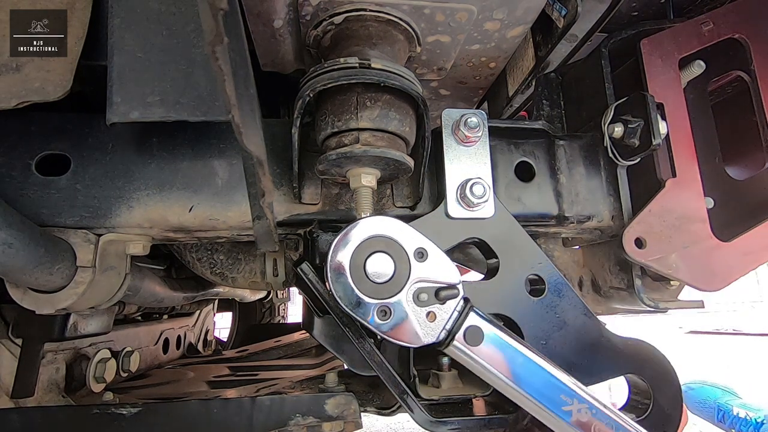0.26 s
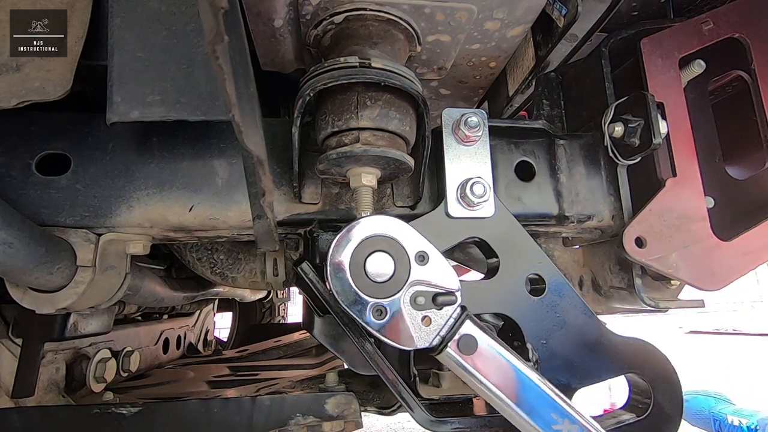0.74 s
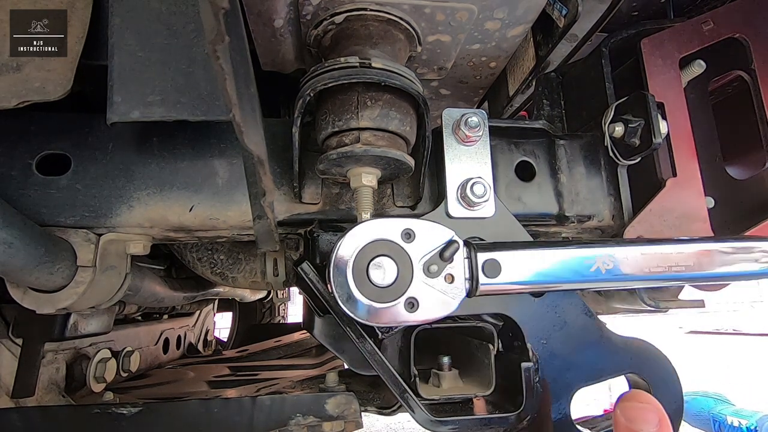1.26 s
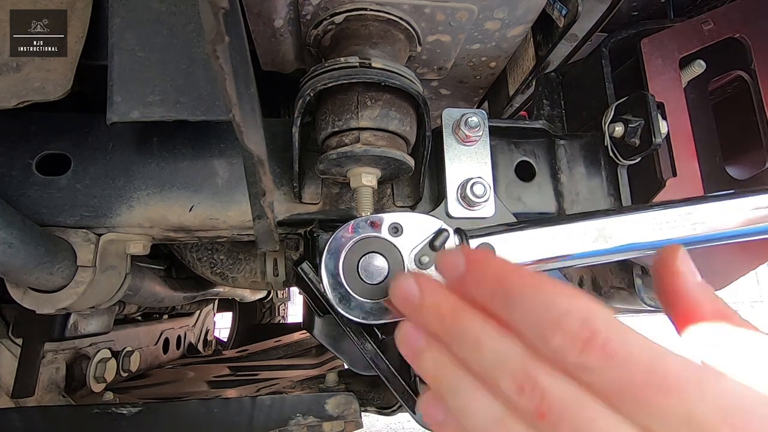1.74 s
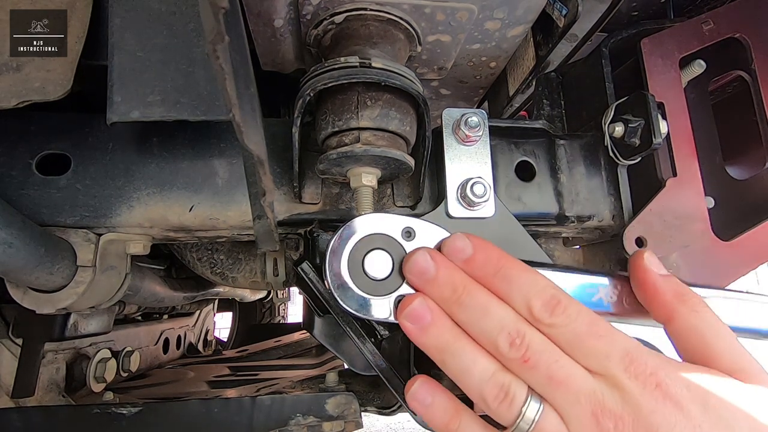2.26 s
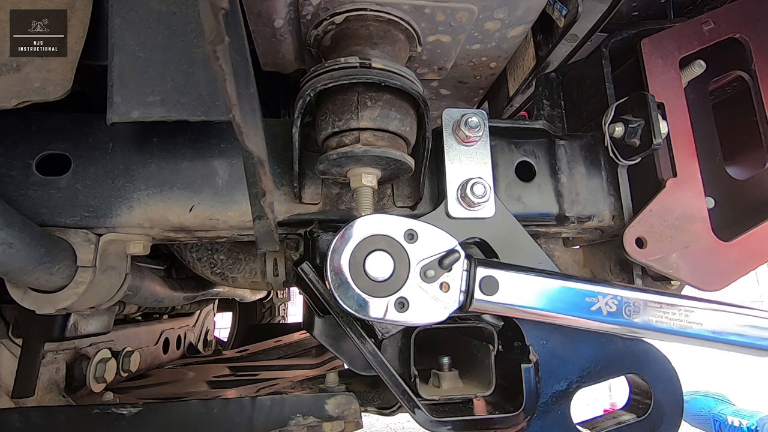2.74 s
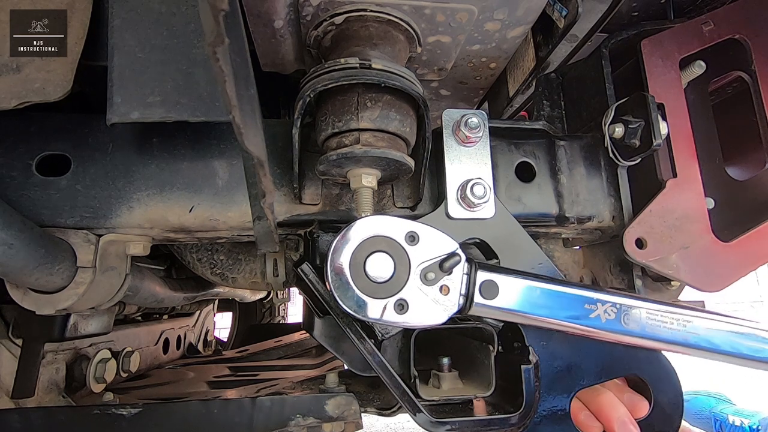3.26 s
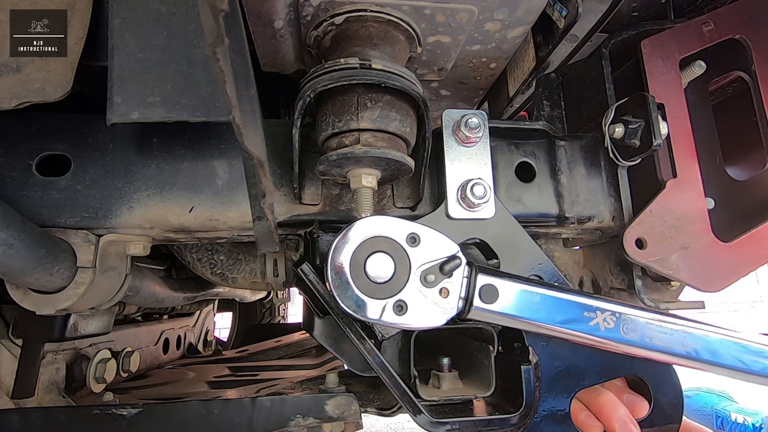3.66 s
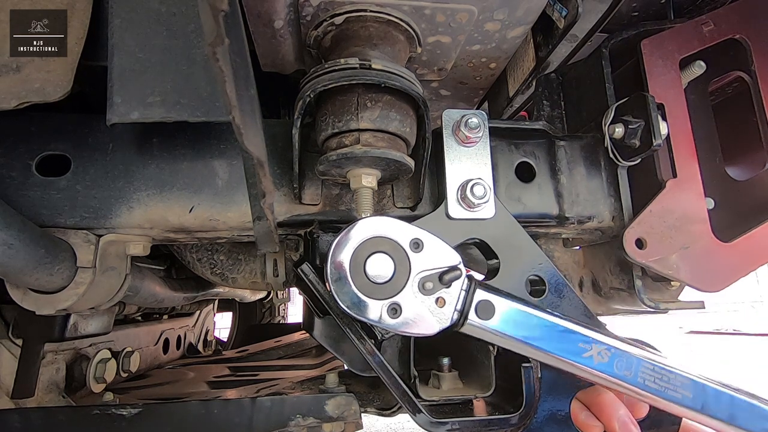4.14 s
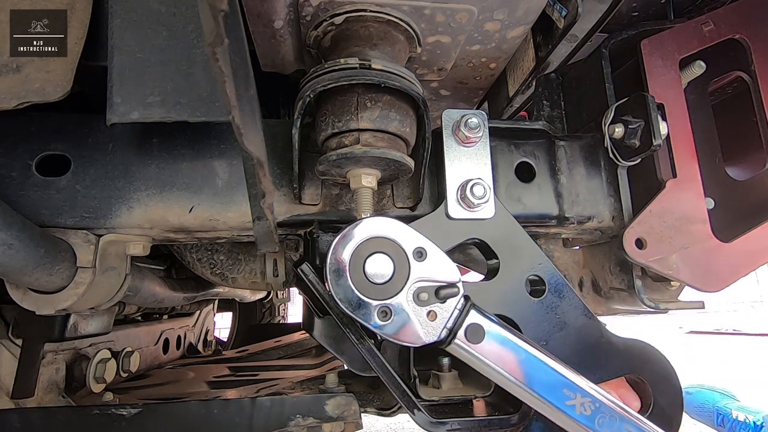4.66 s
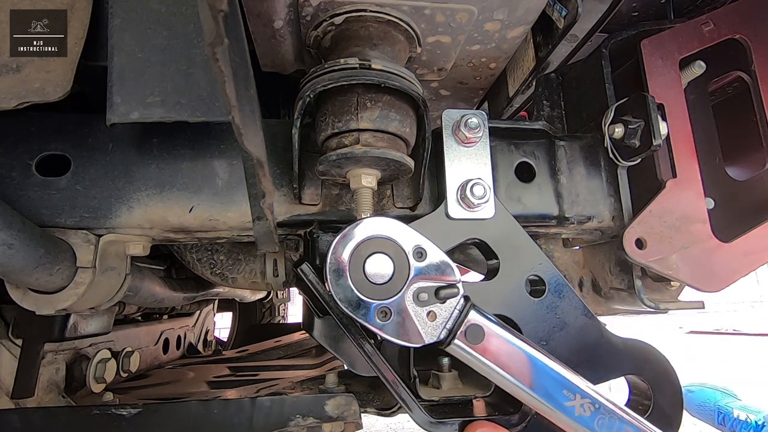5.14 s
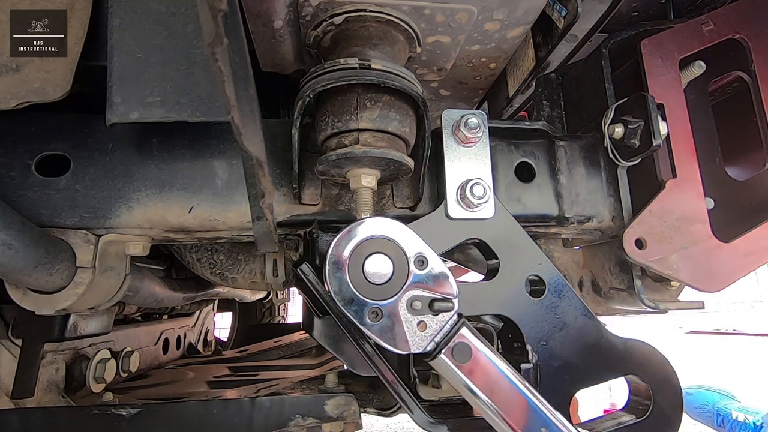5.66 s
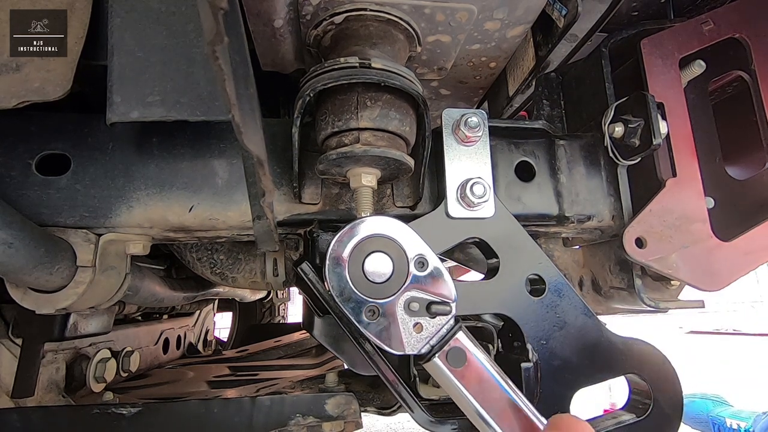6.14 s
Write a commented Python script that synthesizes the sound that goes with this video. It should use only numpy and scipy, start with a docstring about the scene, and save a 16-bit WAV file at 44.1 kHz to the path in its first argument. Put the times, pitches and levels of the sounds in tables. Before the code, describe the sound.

Metal rubs softly, then a ratchet head clicks twice, crisp and near. A low knock of the socket follows among faint ticks, over hushed air and deep rumble. A distant dove-like cooing barely shows, echoing. Tiny squeaks of strained steel lead to two explosive steel cracks about a third of a second apart, ringing briefly under the vehicle. Close, dry, almost centred microphone.

```python
"""Torque wrench under a truck

Close microphone under the vehicle: a click-type wrench tightens a bolt on the frame amid quiet garage air and rumble.
Filtered noise scrapes as the handle swings back; two loud pawl clicks and fainter ticks are decaying noise bursts.
A dull double knock follows, and thin squeaks glide. Something coos faintly far away: trembling tones with echoes.
At the end the wrench breaks over twice: noise bursts for the snap, decaying sines for the ringing steel.
"""
import sys
import numpy as np
from scipy import signal
from scipy.fft import rfft, irfft
from scipy.io import wavfile
from scipy.ndimage import uniform_filter1d

SR = 44100
rng = np.random.default_rng(int(sys.argv[2]) if len(sys.argv) > 2 else 0)


def waveform_to_disk(signal):
    """Save audio, clipped to [-1, 1], as 16-bit WAV at the path in sys.argv[1]."""
    frames = np.transpose(np.atleast_2d(signal))
    scaled = np.clip(frames, -1, 1) * 32767
    samples = np.round(scaled).astype(np.int16)
    wavfile.write(sys.argv[1], SR, samples)


N = 282681
TIME = np.arange(N) / SR  # seconds into the scene
AGE = np.arange(SR) / SR  # seconds since a sound began, up to one second


def undb(db):
    """Decibels to gain."""
    return 10 ** (np.asarray(db) / 20)


def unit(x):
    """Scale to rms 1."""
    return x / np.sqrt(np.mean(x ** 2))


def across(rows, hz):
    """The columns of a frequency table, read at hz on a logarithmic frequency scale."""
    table_hz, *columns = np.transpose(rows)
    log_hz = np.log(np.maximum(hz, 1))
    return [np.interp(log_hz, np.log(table_hz), column) for column in columns]


def noise(colour, size, tilt_db=0):
    """Noise of rms 1 with a given spectrum, tilted above 1 kHz by tilt_db per octave."""
    hz = np.maximum(np.fft.rfftfreq(size, 1 / SR), 1)
    db = across(colour, hz)[0] + tilt_db * np.log2(np.maximum(hz / 1000, 1))
    random_phases = np.exp(2j * np.pi * rng.random(len(hz)))
    return unit(irfft(undb(db) * random_phases, size))


def resonance(hz, width_hz, size):
    """Noise of rms 1 in one steep resonance."""
    f = np.fft.rfftfreq(size, 1 / SR)
    peak = 1 / (1 + (2 * (f - hz) / width_hz) ** 2)
    return unit(irfft(rfft(rng.standard_normal(size)) * peak, size))


def fade(t60):
    """Exponential decay, 60 dB down after t60 seconds."""
    return np.exp(-np.log(1000) * AGE / t60)


def arch(length):
    """A swell that comes and goes within length seconds."""
    return np.sin(np.pi * np.minimum(AGE / length, 1))


def gesture(start, rise_s, hold_s, fall_s):
    """Effort from 0 to 1 and back: it eases up from start, holds, then lets go."""
    up = (TIME - start) / rise_s
    down = (start + rise_s + hold_s + fall_s - TIME) / fall_s
    return np.sin(np.pi / 2 * np.clip(np.minimum(up, down), 0, 1))


def waver(rate_hz):
    """A random wander of rms 1, mostly slower than a few times rate_hz."""
    return noise([(rate_hz, 0), (4 * rate_hz, -40), (8 * rate_hz, -120)], N)


def tone(hz, wobble):
    """A single line of rms 1 whose pitch trembles by the rms share wobble."""
    trembling_hz = hz * (1 + wobble * waver(74)[:len(hz)])
    return np.sqrt(2) * np.sin(2 * np.pi * np.cumsum(trembling_hz) / SR)


def add(out, start, x):
    """Mix x into out from start seconds."""
    i = int(start * SR)
    out[i:i + len(x)] += x[:max(N - i, 0)]


# Resonances of the ratchet head. Each row: centre in Hz, width in Hz, lift in dB.
HEAD_RESONANCES = [(1181, 73, 5.5), (1540, 40, -0.5), (1890, 30, 5.5), (2615, 220, 6.5), (3340, 150, 2.5),
                   (4340, 100, 3), (5200, 100, 4), (6000, 120, -3), (6750, 200, 0.5), (7700, 150, -2),
                   (10300, 230, 5.5), (12000, 200, 1.5)]


def head(x):
    """Lift the narrow resonances of the ratchet head, then scale to rms 1."""
    hz = np.fft.rfftfreq(len(x), 1 / SR)
    gain = 1
    for centre_hz, width_hz, db in HEAD_RESONANCES:
        gain = gain + (undb(db) - 1) / (1 + (2 * (hz - centre_hz) / width_hz) ** 2)
    return unit(irfft(rfft(x) * gain, len(x)))


# How fast a blow dies under the vehicle, before each blow's own length factor.
# Each row: frequency in Hz, early t60 in seconds, late t60 in seconds.
BLOW_DECAY = [(100, 0.81, .9), (400, 0.5, 0.63), (1000, 0.4, 0.45), (2500, 0.21, 0.52), (6000, 0.12, 0.3),
              (13100, 0.051, 0.21)]
LATE_DB = -20  # level of the lingering part against the early part


def blow(wash, length, rise_s, cluster_db=2.5):
    """Crowded modes and close reflections of one blow: each octave dies fast at first, then lingers."""
    # modes bunch at random, so peaks and gaps a few tens of Hz wide run through the spectrum
    clusters = unit(uniform_filter1d(rng.standard_normal(len(AGE) // 2 + 1), size=36))
    spectrum = rfft(wash) * unit(undb(cluster_db * clusters))
    octave = np.log2(np.clip(np.fft.rfftfreq(len(AGE), 1 / SR), 2 ** 6, 2 ** 14))
    out = 0
    for k in range(6, 15):  # overlapping bands centred on 64 Hz to 16384 Hz
        early, late = across(BLOW_DECAY, 2 ** k)
        band = irfft(spectrum * np.maximum(1 - abs(octave - k), 0), len(AGE))
        lingering = undb(LATE_DB) * fade(late * np.sqrt(length))
        out = out + band * np.hypot(fade(early * length), lingering)
    return out * (1 - np.exp(-AGE / rise_s))


# Modes of wrench, bracket and frame, before scatter and the blow's own level.
# Each row: frequency in Hz, level in dB, t60 in seconds.
STEEL_MODES = [(75, -49, 2.2), (157.9, -45, 1), (230, -42.5, 0.72), (298.7, -34.5, 0.5), (364.4, -29, 0.73),
               (392, -35, 1.3), (455, -37, 0.47), (584, -29, 0.43), (719, -31.5, 0.87), (762, -30.5, 0.31),
               (832, -20, 0.14), (910, -26, 0.32), (945, -33.5, 0.19), (982, -22, 0.21), (1040, -28, 0.51),
               (1079, -16, 0.12), (1199, -23.5, 0.2), (1203, -20.5, 0.16), (1605, -32.5, 0.37),
               (1854, -32, 0.34), (2186, -46.5, 0.24), (2743, -27.5, 0.28), (2840, -32, 0.3),
               (2880, -38.5, 0.44), (3360, -26.5, 0.088), (3950, -38, 0.14), (4140, -12.5, 0.096),
               (3990, -41, 0.29), (5600, -40.5, .16), (7040, -15, 0.09)]


def ring(soft_hz, scatter_db):
    """The steel's modes as decaying sines; a soft contact weakens those above soft_hz."""
    out = 0
    scatter = rng.standard_normal((len(STEEL_MODES), 3))
    for (hz, db, t60), (size, detune, phase) in zip(STEEL_MODES, scatter):
        gain = undb(db + scatter_db * size) / (1 + (hz / soft_hz) ** 2)
        mode_hz = hz * (1 + 0.002 * detune)
        out = out + gain * fade(t60) * np.sin(2 * np.pi * (mode_hz * AGE + phase))
    return out * (1 - np.exp(-AGE / 0.003))


# Quiet garage air around the microphone. Each row: frequency in Hz, relative level in dB per Hz.
AIR_COLOUR = [(35, -33), (60, 2.5), (96, -7), (291, -9.5), (343, -12), (705, -14), (792, -18), (910, -16.5),
              (1120, -19.5), (1230, -19.5), (1910, -23.5), (15500, -32)]
AIR_DB = -63.5


def garage_air():
    """Steady noise with the colour of the garage, the same in both channels."""
    return undb(AIR_DB) * noise(AIR_COLOUR, N)


# Deep rumble at the microphone. Each row: frequency in Hz, relative level in dB per Hz.
RUMBLE_SPECTRUM = [(1, -7), (3, 1.5), (6, 3), (10, -17.5), (20, -19.5), (40, -37.5), (80, -59), (300, -100),
                   (1000, -140)]
# it builds while the wrench is reset, then settles for the slow pull
RUMBLE_DB, RUMBLE_SWELL_DB = -38.5, 9
RUMBLE_BUILD_S, RUMBLE_HOLD_S, RUMBLE_SETTLE_S = 2.62, 0.11, 0.22


def rumble():
    """Deep slow stirring at the microphone, stronger while the wrench is moved about."""
    bustle = gesture(0, RUMBLE_BUILD_S, RUMBLE_HOLD_S, RUMBLE_SETTLE_S)
    return undb(RUMBLE_DB + RUMBLE_SWELL_DB * bustle) * noise(RUMBLE_SPECTRUM, N)


# Strokes close by in which head and socket rub.
# Each row: start in seconds, hold in seconds, release t60 in seconds, level in dB.
RUB_STROKES = [(0, 0.037, 1.2, -73.5), (0.79, .07, 0.71, -63), (0.889, 0.22, 0.92, -50.5),
               (1.642, .6, 2, -64), (2.277, 0.012, 0.24, -48.5), (2.863, .08, .8, -74),
               (5.29, .04, 1, -67.5), (5.605, 0.028, 1, -63)]
# Colour of the rubbing, before the head's resonances. Each row: frequency in Hz, relative level in dB per Hz.
RUB_SPECTRUM = [(100, -1.5), (300, -1), (480, -2.5), (750, 0.5), (1000, -7.5), (1600, -5), (2400, -13),
                (4000, -17), (7000, -22.5), (15000, -41)]
# Thin dry hiss of sliding contact, before the head's resonances and the swell.
# Each row: start in seconds, length in seconds, centre in Hz, width in Hz, level in dB.
SLIDE_HISSES = [(0.376, 0.22, 4270, 2730, -70), (0.601, 0.23, 4280, 2420, -67),
                (0.889, 0.063, 7700, 1100, -58), (0.937, 0.37, 5160, 600, -60.5),
                (0.93, 0.43, 10800, 9000, -64.5), (1.845, .5, 5400, 2400, -76),
                (2.837, 0.26, 3500, 7000, -68)]
RUB_ATTACK_S, GRIP_DB = 0.022, -78  # a stroke starts quickly; the held wrench never rests entirely


def rubbing():
    """Metal slips in uneven little steps during each stroke, with a thin hiss where surfaces slide."""
    slip_sizes = undb(2.9 * rng.exponential(size=N))
    slips = (rng.random(N) < 300 / SR) * slip_sizes  # about 300 per second
    power = signal.fftconvolve(slips, fade(0.087))[:N]
    grain = np.sqrt(np.abs(power) / np.mean(power))
    friction = undb(GRIP_DB)
    for start, hold, t60, db in RUB_STROKES:
        attack = np.clip((TIME - start) / RUB_ATTACK_S, 0, 1)
        since_hold = np.maximum(TIME - start - RUB_ATTACK_S - hold, 0)
        release = np.exp(-np.log(1000) * since_hold / t60)
        friction = np.hypot(friction, undb(db) * attack * release)
    out = friction * grain * head(noise(RUB_SPECTRUM, N))
    for start, length, hz, width_hz, db in SLIDE_HISSES:
        hiss = head(resonance(hz, width_hz, len(AGE)))
        add(out, start, undb(db) * arch(length) * hiss)
    return out


# Faint thin squeaks of strained steel, before their shared waver in level.
# Each row: start in seconds, length in seconds, starting pitch in Hz, glide in Hz per second, level in dB.
STEEL_SQUEAKS = [(0.297, .055, 2650, 6497, -72), (5.404, 0.16, 2485, -200, -76.5),
                 (5.587, 0.057, 2550, 807, -73), (5.727, .11, 2500, 698, -78)]


def squeaks():
    """Steel sticks and slips fast enough to sing: short, unsteady glides."""
    out = np.zeros(N)
    for start, length, hz, glide, db in STEEL_SQUEAKS:
        pitch_hz = hz + glide * np.minimum(AGE, length)
        add(out, start, undb(db) * arch(length) * tone(pitch_hz, wobble=.005))
    return out * undb(2.5 * waver(25))


# Pawl clicks and small ticks of the head, close by.
# Each row: start in seconds, level in dB, tilt above 1 kHz in dB per octave, length factor on the blow's decay.
PAWL_CLICKS = [(0.8, -56.5, -10, 0.8), (0.8972, -49, -12.5, 1.3), (0.9239, -40, -11, 0.56),
               (0.948, -47, -11, 0.77), (1.0761, -27, 1.5, 0.91), (1.2058, -23.5, 2.44, 0.68),
               (1.3325, -47.5, -12.5, 0.63), (1.415, -53.5, -19, 0.88), (1.8452, -48, -4.5, 0.85),
               (2.268, -50.5, -12, 0.73), (2.313, -48.5, -9.5, 0.34), (2.3446, -52, -7.5, 0.36),
               (2.4978, -58, 1, 0.31), (3.6273, -41.5, -0.5, 0.33), (4.8546, -54.5, 0, 0.55),
               (5.63, -58, -11, 1.8)]
# Colour of a click before its tilt. Each row: frequency in Hz, relative level in dB per Hz.
PAWL_COLOUR = [(150, -19.5), (600, -15), (1300, -4.5), (3500, -5.5), (5300, 1), (8500, -1.5), (10500, -5),
               (11400, -8.5), (13000, -4.5), (15500, -20)]


def ratchet():
    """The pawl drops over a tooth: a short crack, then a wash coloured by the head."""
    out = np.zeros(N)
    for start, db, tilt_db, length in PAWL_CLICKS:
        crack = undb(-1.0) * noise(PAWL_COLOUR, len(AGE), tilt_db)
        crack = crack * fade(0.012) * (1 - np.exp(-AGE / 0.0032))
        wash = blow(head(noise(PAWL_COLOUR, len(AGE), tilt_db)), length, rise_s=0.0005)
        add(out, start, undb(db) * (crack + wash))
    return out


# The socket knocks close by as it takes up load. Each row: start in seconds, level in dB.
SOCKET_KNOCKS = [(2.317, -39.5), (2.341, -51.5)]
# Colour of a knock's thud. Each row: frequency in Hz, relative level in dB per Hz.
KNOCK_COLOUR = [(60, -5), (170, -11), (290, 3), (400, -7.5), (600, -11), (1200, -18), (2500, -30),
                (8000, -54)]


def knocks():
    """Slack closes with a dull double knock that wakes mainly the frame's low modes."""
    out = np.zeros(N)
    for start, db in SOCKET_KNOCKS:
        thud = blow(noise(KNOCK_COLOUR, len(AGE)), length=0.96, rise_s=0.0022)
        low_ring = undb(26.0) * ring(soft_hz=410, scatter_db=-1.0)
        add(out, start, undb(db) * (thud + low_ring))
    return out


# Two coos far from the microphone, perhaps a dove; levels are before hoarseness and echoes. Each row:
# start in seconds, rise in seconds, hold in seconds, fall in seconds, top pitch in Hz, level in dB.
FAR_COOS = [(2.825, 0.1075, .005, 0.0245, 738, -60.5), (3.099, 0.051, .22, .17, 651, -61)]
COO_SCOOP, COO_SWELL = 0.18, .45  # share by which pitch sags without effort; power of effort giving loudness


def coos():
    """A slightly hoarse hoot whose pitch and loudness follow the effort, smeared by echoes on its long way."""
    hoot = 0
    for start, rise, hold, fall, top_hz, db in FAR_COOS:
        effort = gesture(start, rise, hold, fall)
        pitch_hz = top_hz * (1 - COO_SCOOP * (1 - effort))
        hoot = hoot + undb(db) * effort ** COO_SWELL * tone(pitch_hz, wobble=.04)
    hoot = hoot * (1 + .3 * waver(50))  # hoarseness
    echoes = rng.standard_normal(len(AGE)) * fade(0.41)
    far = signal.fftconvolve(hoot, echoes / np.linalg.norm(echoes))[:N]
    return hoot + .4 * far


# Break-over snaps close by. Each row: start in seconds, clash level in dB, gain on the steel's ring in dB,
# shrill centre in Hz, shrill level in dB before its swell.
BREAK_OVERS = [(5.8457, -8.5, 0, 6180, -12.5), (6.1946, -9.5, -3, 6950, -14)]
# The clash of steel on steel. Each row: frequency in Hz, relative level of the first snap in dB per Hz,
# relative level of the second snap in dB per Hz.
CLASH_COLOURS = [(60, -27.5, -18), (153, -14, -16.5), (300, -14.5, -6.5), (605, -4, 5.5), (660, -3, -1),
                 (1020, 3, 4.5), (1170, -3.5, -3.5), (1360, -3.5, -8), (1610, -2, 5.5), (2720, -6, -1.5),
                 (3620, -8.5, 2), (4200, -1.5, 0.5), (7200, -2.5, 2.5), (8340, -7.5, -3), (12000, -11, -10),
                 (15000, -9.5, -6.5)]


def snaps():
    """The toggle lets go: the head slaps the tube, shrills for a few milliseconds and rings the frame."""
    out = np.zeros(N)
    hz, *colours = np.transpose(CLASH_COLOURS)
    swell = AGE / 0.0011
    burst = swell * np.exp(1 - swell)  # peaks at 1.1 ms
    for (start, db, ring_db, shrill_hz, shrill_db), colour in zip(BREAK_OVERS, colours):
        wash = noise(np.column_stack([hz, colour]), len(AGE))
        add(out, start, undb(db) * blow(wash, length=0.94, rise_s=0.00088))
        add(out, start, undb(ring_db) * ring(soft_hz=25000, scatter_db=0.3))
        add(out, start, undb(shrill_db) * resonance(shrill_hz, 1100, len(AGE)) * burst)
    return out


# Hiss at the microphone that differs between the channels.
# Each row: frequency in Hz, relative level in dB per Hz.
SIDE_HISS_COLOUR = [(30, 4), (70, 2.5), (200, -3.5), (700, -2.5), (2400, 0), (6000, 2), (11000, 1),
                    (15000, -8)]


def scene():
    """Nearly all straight ahead: channels differ by a sliver of level and delay, and by faint air and hiss."""
    mid = garage_air() + rumble() + rubbing() + squeaks() + ratchet() + knocks() + coos() + snaps()
    side = undb(-50.0) * mid  # level difference
    side = side + undb(-29) * np.gradient(mid)  # the slope acts as a tiny delay
    side = side + undb(-83) * noise(SIDE_HISS_COLOUR, N) + undb(-91.5) * noise(AIR_COLOUR, N)
    return np.array([mid + side, mid - side])


TOP_HZ = 15900  # edge of the treble cut


def record(dry):
    """A soft ceiling rounds the highest peaks, then a steep low-pass cuts the top."""
    ceiling = undb(.5)
    rounded = ceiling * np.tanh(dry / ceiling)
    low_pass = signal.ellip(10, .1, 80, TOP_HZ, fs=SR, output="sos")
    return signal.sosfilt(low_pass, rounded)


dry = scene()
out = record(dry)
waveform_to_disk(out)
```